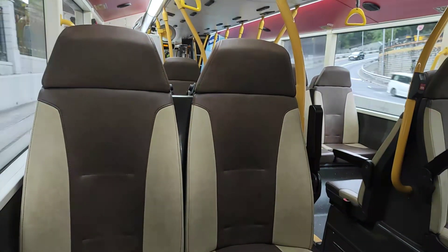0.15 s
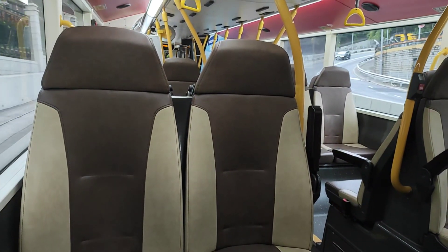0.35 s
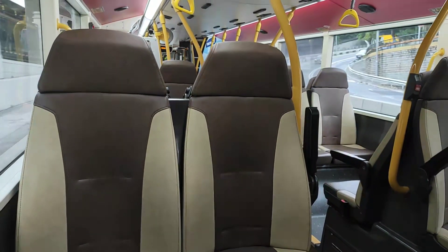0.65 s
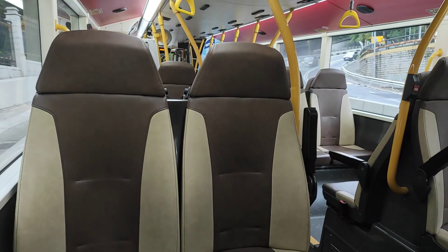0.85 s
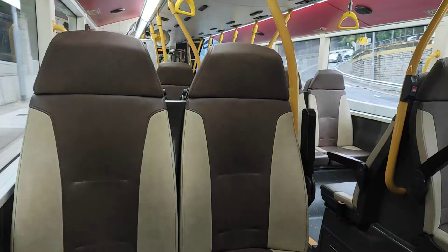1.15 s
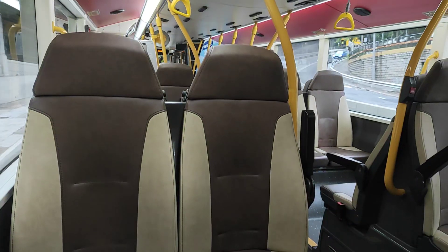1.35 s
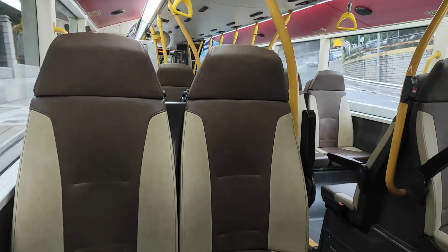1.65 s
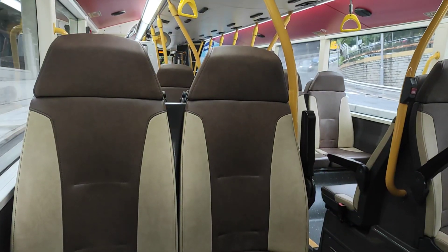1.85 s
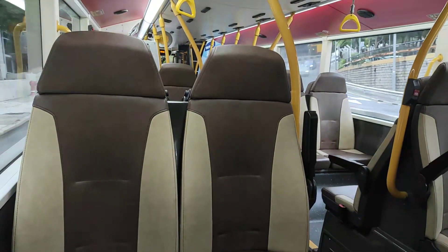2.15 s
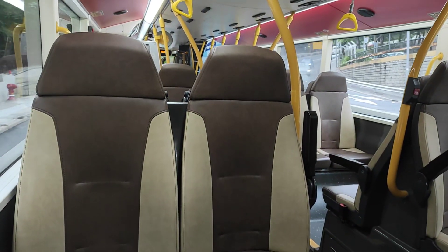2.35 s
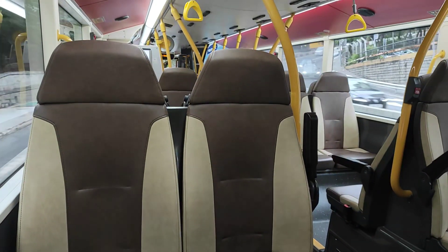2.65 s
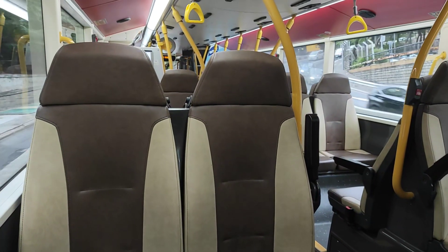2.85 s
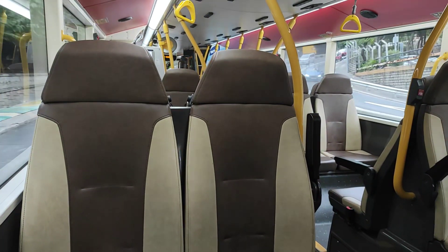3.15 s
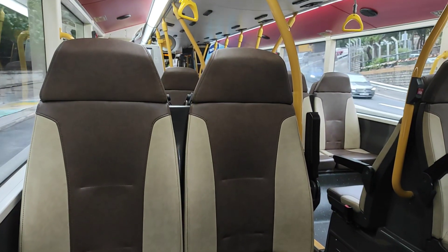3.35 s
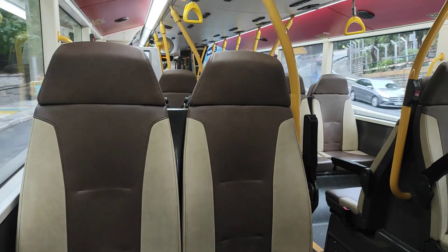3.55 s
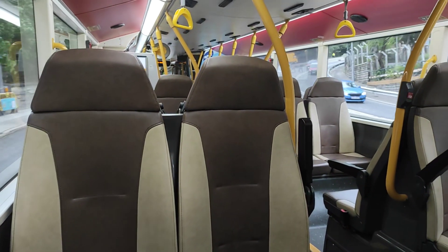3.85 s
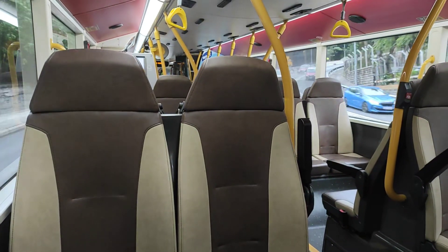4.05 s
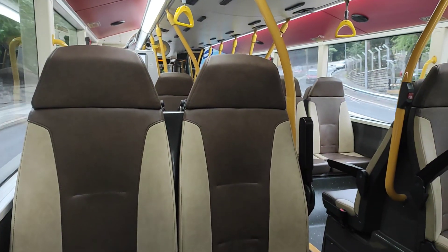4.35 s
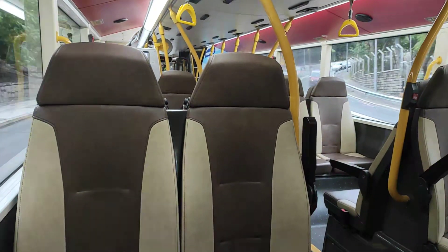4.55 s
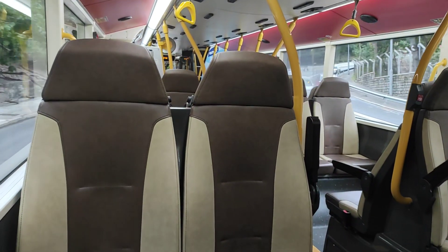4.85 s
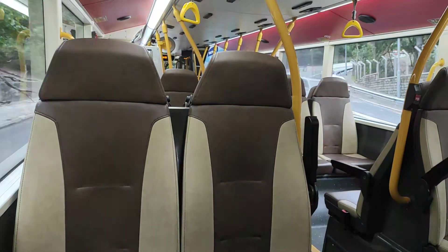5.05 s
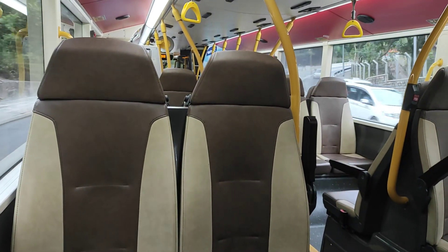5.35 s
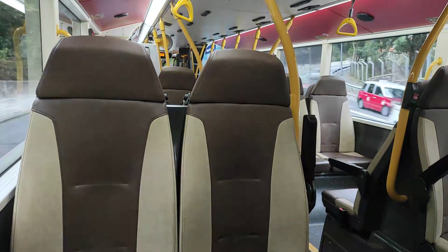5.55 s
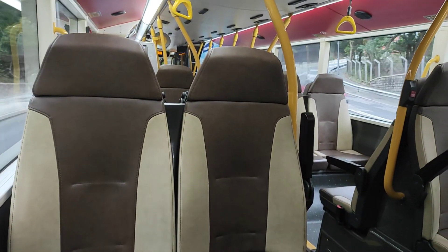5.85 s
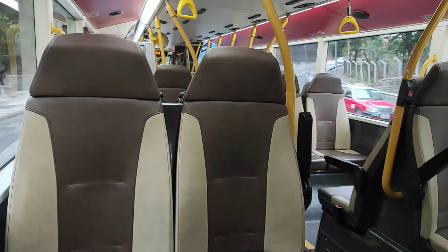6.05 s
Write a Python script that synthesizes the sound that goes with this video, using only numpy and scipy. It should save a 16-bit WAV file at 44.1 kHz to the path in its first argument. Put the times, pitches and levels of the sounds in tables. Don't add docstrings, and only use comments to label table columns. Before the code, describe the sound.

Inside a bus upper deck, a diesel engine drones and slowly climbs in pitch, then drops at a gear change over road roar and rattling trim.

```python
import sys
import numpy as np
from scipy import signal
from scipy.fft import rfft, irfft, dct, next_fast_len
from scipy.io import wavfile
from scipy.ndimage import uniform_filter1d, map_coordinates

SR = 44100
rng = np.random.default_rng(int(sys.argv[2]) if len(sys.argv) > 2 else 0)


def master_out(mix):
    frames = np.transpose(np.atleast_2d(mix))
    ceiling = np.clip(frames, -1, 1)
    pcm = np.round(ceiling * 32767).astype(np.int16)
    wavfile.write(sys.argv[1], SR, pcm)


def invert_db(x):
    u = np.asarray(x, float) / 20
    return 10 ** u


N = 273861


def unit(x):
    return x / np.sqrt(np.mean(x ** 2) + 1e-20)


def along(points, hz):
    f, v = np.transpose(points)
    return np.interp(np.log(hz + 1), np.log(f + 1), v)


def curves(rows):
    s, *columns = np.transpose(rows)
    return [np.interp(np.arange(N) / SR, s, column) for column in columns]


def wobble(rate):
    at = np.arange(0, N + 32, 32)
    knots = rng.standard_normal(int(N * 400 / SR) + 4)
    return np.interp(np.arange(N), at, map_coordinates(knots, [at * rate / SR]))


def humps(times, db, half_s):
    t = np.arange(0, N + 64, 64) / SR
    power = sum(invert_db(2 * d) * np.exp(-((t - s) / half_s) ** 2) for s, d in zip(times, db))
    return np.interp(np.arange(N) / SR, t, power)


def filtered(x, response):
    m = next_fast_len(N + SR // 2)
    return irfft(rfft(x, m) * response(np.fft.rfftfreq(m, 1 / SR)), m)[..., :N]


# frequency_hz, likeness (0-1)
PORT_LIKENESS = [(30, .996), (80, .996), (130, .97), (200, .84), (340, .68), (480, .4), (600, .15),
                 (1070, .03), (16000, 0)]


def port_angle(hz):
    return np.arccos(np.clip(along(PORT_LIKENESS, hz), -1, 1)) / 2


def rush(spectrum, patchy_db, source=None):
    noise = rng.standard_normal((2, N)) * (1 if source is None else source)
    z = signal.stft(noise, nperseg=512)[2]
    patches = uniform_filter1d(rng.standard_normal(z.shape[1:]), size=5, axis=0)
    patches = uniform_filter1d(patches, size=10, axis=1)
    pair = signal.istft(z * invert_db(patchy_db * unit(patches)), nperseg=512)[1][:, :N]

    def response(hz):
        angle = port_angle(hz)
        return invert_db(along(spectrum, hz)) * [np.cos(angle), np.sin(angle)]

    mid, side = filtered(pair, response)
    return np.array([mid + side, mid - side]) / np.std(mid)


def tone(hz, fuzz_hz, start=0):
    cycles = np.cumsum(hz + fuzz_hz * wobble(60)) / SR + start
    apart = port_angle(hz.mean()) * np.array([[1], [-1]])
    return np.sqrt(2) * np.sin(2 * np.pi * cycles + apart * rng.choice([-1, 1]))


# time_s, level_db
ROUGHNESS = [(0, -36.5), (.22, -37.5), (.4, -39), (1.0, -38), (1.12, -35.5), (1.8, -36), (2.4, -37.5),
             (2.75, -36.5), (3.3, -37.5), (4.0, -37), (4.2, -35.5), (5.3, -36.5), (5.64, -38.5),
             (6.21, -38.5)]


def road_db():
    db, = curves(ROUGHNESS)
    return db - db.mean()


# frequency_hz, level_db
LOW_COLOUR = [(30, -59), (50, 4), (75, 2), (100, 4.5), (150, 5), (185, 1.5), (205, -4), (350, -3),
              (590, -8), (670, -12), (1130, -11), (1300, -14.5), (1500, -36.5), (2500, -120)]
# frequency_hz, level_db
UPPER_COLOUR = [(700, -120), (1200, -3.5), (1500, -3), (2100, -2), (2650, -1), (3300, -4), (3500, -8),
                (4200, -10.5), (5500, -9.5), (7000, -11.5), (12000, -120)]


def roar():
    road = road_db()
    low = invert_db(-23 + 0.5 * road) * rush(LOW_COLOUR, patchy_db=0.7)
    upper = invert_db(-35.5 + 0.9 * road + 0.18 * wobble(8.3)) * rush(UPPER_COLOUR, patchy_db=0.5)
    return low + upper


# frequency_hz, level_db
BOUNCE_COLOUR = [(5, -40), (9, -10), (11.5, 0), (14.5, -4), (19, -25), (40, -120)]
# frequency_hz, level_db
THUD_COLOUR = [(10, -57), (18, -2), (25, -5), (33, -3.5), (45, -11), (60, -27), (90, -120)]
# time_s, bounce_db, thud_db
ROAD_SWELLS = [(.15, -18.5, -36), (.6, -39, -23), (1.199, -13, -24.5), (1.45, -21, -24), (1.8, -23, -18.5),
               (2.2, -18.5, -24.5), (2.65, -20.5, -14), (2.92, -15.5, -31.5), (3.3, -19.5, -18),
               (3.85, -23.5, -16.5), (4.2, -18.5, -18), (4.55, -18.5, -22), (4.95, -25.5, -14),
               (5.35, -17, -21.5), (5.62, -15, -29.5), (6.05, -26.5, -19.5)]


def body():
    swell_s, even_s, evenness = 0.12, 0.18, 0.8
    s, bounce_db, thud_db = np.transpose(ROAD_SWELLS)
    road = road_db()
    out = 0
    for colour, rest_db, db in (BOUNCE_COLOUR, -28, bounce_db), (THUD_COLOUR, -23.5, thud_db):
        swing = rush(colour, patchy_db=0.5)
        power = np.abs(uniform_filter1d(swing.mean(0) ** 2, size=int(even_s * SR))) + 0.018
        size = np.sqrt(invert_db(2 * (rest_db + 0.9 * road)) + humps(s, db, swell_s))
        out = out + size * unit(swing / power ** (evenness / 2))
    return out


# frequency_hz, level_db
TRIM_COLOUR = [(1500, -74), (3000, -15), (4500, -14.5), (6300, -12.5), (7000, -4.5), (7580, -0.5),
               (8300, -3), (9300, -8), (10000, -12.5), (10400, -21.5), (11400, -24.5), (12300, -25),
               (14500, -24.5), (16500, -64)]
# time_s, rattle_db (above the sizzle)
ROAD_JOINTS = [(0.0, 3), (0.119, 3.5), (1.08, 1.5), (1.158, 0), (1.39, -3.5), (1.759, 1.5), (2.0, -4.5),
               (2.59, -5.5), (2.728, 0.5), (2.92, 2), (3.44, -2.5), (3.17, -1), (3.75, -2), (4.09, 1),
               (4.249, 2.5), (4.36, 1), (4.55, -7), (4.769, 2), (4.982, 5.5), (5.422, -1), (5.51, 3.5),
               (5.86, -6)]


def sizzle():
    rattle_s = 0.022
    size = invert_db(-37 + road_db()) * np.sqrt(1 + humps(*np.transpose(ROAD_JOINTS), rattle_s))
    contacts = invert_db(1.5 * wobble(350) + 0.58 * wobble(30))
    return size * rush(TRIM_COLOUR, patchy_db=1.0, source=contacts)


# start_s, peak_db, left_right_db
KNOCKS = [(0.6913, -30, 6), (2.7112, -36, -3), (3.4191, -24, -8), (4.0502, -20, -1), (4.0816, -20, -3),
          (4.2233, -20, -7), (4.351, -9, -7), (4.8534, -21, -6), (4.9701, -12, 4), (5.5363, -24, 2),
          (6.0496, -22, -14), (6.1664, -19, 12)]


def knocks():
    out = np.zeros((2, N + SR))
    t = np.arange(SR // 20) / SR
    for s, db, pan_db in KNOCKS:
        burst = invert_db(db - 12.5 - 60 * t / 0.03) * rng.standard_normal((2, len(t)))
        first = round(s * SR)
        out[:, first:first + len(t)] += burst * invert_db([[pan_db / 2], [-pan_db / 2]])
    return filtered(out[:, :N], lambda hz: invert_db(along(TRIM_COLOUR, hz)))


# time_s, pitch_hz, level_db (rms)
BLADE_WHISTLE = [(0, 8914, -45), (.3, 9090, -47), (.5, 9340, -44), (.75, 9535, -40), (1.1, 9790, -45),
                 (1.4, 9850, -46.5), (1.8, 9990, -50), (2.25, 10400, -47), (2.6, 10700, -50),
                 (3.0, 10940, -49.5), (3.6, 11050, -48), (4.6, 11090, -50), (4.85, 10980, -50),
                 (5.0, 10630, -49), (5.4, 10150, -50), (5.54, 9820, -35), (5.76, 9710, -41.5),
                 (6.21, 9720, -44.5)]


def turbo():
    hz, db = curves(BLADE_WHISTLE)
    flicker = invert_db(3.5 * np.array([wobble(40), wobble(40)]))
    core = np.array([tone(hz, fuzz_hz=48)[0], tone(hz, fuzz_hz=48)[0]])
    skirt = np.array([tone(hz, fuzz_hz=130)[0], tone(hz, fuzz_hz=130)[0]])
    return invert_db(db + 2.5) * (unit(flicker) * core + invert_db(-6.5) * skirt)


# time_s, cycle_hz (four-stroke cycles)
ENGINE_SPEED = [(0, 12.09), (.4, 12.1), (.8, 12.21), (1.3, 12.24), (1.6, 12.38), (2.4, 12.57), (2.8, 12.86),
                (4.0, 13.38), (4.4, 13.43), (4.8, 13.57), (5.2, 12.1), (5.3, 11.51), (5.5, 10.04),
                (5.6, 9.79), (5.9, 9.71), (6.21, 9.69)]


def engine_cycle_hz():
    return curves(ENGINE_SPEED)[0]


# multiple (of the cycle), early_db (rms), later_db (rms)
DRIVEN_WHINES = [(81, -52, -53), (93, -53, -54), (250.7, -50, -52), (288, -57, -62), (401, -53, -58),
                 (451, -51, -59)]


def whines():
    cycle_hz = engine_cycle_hz()
    out = np.zeros((2, N))
    for k, early_db, later_db in DRIVEN_WHINES:
        db, = curves([(1.2, early_db), (1.7, later_db), (5.0, later_db), (5.3, later_db - 7)])
        out += invert_db(db + 2 * wobble(4)) * tone(k * cycle_hz, fuzz_hz=6)
    return out


# frequency_hz, width_hz, level_db
CABIN_RESONANCES = [(56.3, 1.5, 2.5), (72.67, 4.4, -5), (125, 18.3, -4.5), (143.2, 5.3, -7),
                    (157.5, 3, -2.5), (185.4, 6.5, -1.5), (255, 8.2, -9), (305, 16, 1.5), (348, 8.9, 9.5),
                    (367.5, 7.9, 1.5), (443, 17, -2.5), (483, 17, 3), (586, 20, 2)]


def cabin_gain(hz):
    power = sum(invert_db(db) ** 2 / (1 + (2 * (hz - c) / w) ** 2) for c, w, db in CABIN_RESONANCES)
    return np.sqrt(power + invert_db(-27.0) ** 2)


# multiple (of the cycle), level_db (rms)
ENGINE_ORDERS = [(5, -32), (6, -14.5), (7, -36), (9, -20), (10, -23.5), (11, -31), (12, -18), (13, -35),
                 (14, -22.5), (15, -28.5), (16, -33.5), (17, -27.5), (18, -31), (19, -33.5), (20, -34.5),
                 (21, -37), (22, -38), (23, -42.5), (24, -38), (26, -44), (27, -48), (30, -37.5),
                 (33, -40.5), (36, -41.5), (39, -46.5), (40, -40), (45, -38), (48, -41.5), (50, -39),
                 (51, -47.5)]
# time_s, level_db
FIRING_SWELLS = [(0, 1), (.7, 1.5), (1.2, -2), (1.7, -2.5), (2.3, 3.5), (2.65, 3.5), (2.95, -3), (3.45, -4),
                 (3.8, 0), (4.2, 3), (4.8, -2), (5.25, 2.5), (5.5, -2.5), (6.21, -1)]


def engine():
    cycle_hz = engine_cycle_hz()
    firing_db, = curves(FIRING_SWELLS)
    null_db = 7.5 * np.exp(-((cycle_hz - 12.38) / 0.23) ** 2)
    second_db = 2 + 0.17 * firing_db - null_db
    swell_db = {6: firing_db, 12: second_db}
    shift_s, shift_half_s = 5.4, 0.15
    cut_db = 1.5 * np.exp(-((np.arange(N) / SR - shift_s) / shift_half_s) ** 2)
    grid_hz = np.arange(20., 800.)
    cabin = cabin_gain(grid_hz)
    out = np.zeros((2, N))
    for k, db in ENGINE_ORDERS:
        k = round(k)
        gain = invert_db(db - cut_db + swell_db.get(k, 0) + 0.7 * wobble(3))
        gain = gain * np.interp(k * cycle_hz, grid_hz, cabin)
        late = 0.04 * k ** 2
        out += gain * tone(k * cycle_hz, fuzz_hz=0.1, start=-late)
    return out


def scene():
    return roar() + body() + sizzle() + knocks() + turbo() + whines() + engine()


# frequency_hz, step_db (above the usual level)
BAND_STEPS = [(300, -20), (800, -6), (1400, 5), (2600, 5), (3600, 7.5), (5000, 7.5), (6300, 6), (7500, 3),
              (9000, 6), (9900, 10), (10500, 16), (11300, 19), (12300, 20), (14200, 14), (15300, 22)]


def coarse_bands(x, scatter_db):
    hop = 940
    frames = N // hop + 2
    window = np.sin(np.pi * (np.arange(2 * hop) + 0.5) / (2 * hop))
    halves = np.pad(x, ((0, 0), (hop, frames * hop - N))).reshape(2, frames + 1, hop)
    blocks = np.concatenate([halves[:, :-1], halves[:, 1:]], axis=2) * window
    a, b, c, d = np.split(blocks, 4, axis=2)
    folded = np.concatenate([-c[..., ::-1] - d, a - b[..., ::-1]], axis=2)
    lines = dct(folded, type=4, norm="ortho")
    usual = signal.medfilt(np.median(np.abs(lines), axis=(0, 1)), kernel_size=15) * 1.5
    scatter = np.repeat(rng.standard_normal((frames, hop // 6 + 1)), 6, axis=1)[:, :hop]
    scatter = unit(uniform_filter1d(scatter, size=3, axis=0))
    hz = np.arange(hop) * SR / (2 * hop)
    masked = uniform_filter1d(np.abs(lines), size=9, axis=2) * (hz > 9000)
    step = usual * invert_db(along(BAND_STEPS, hz) + scatter_db * scatter)
    step = np.maximum(step, masked) + 1e-9
    kept = np.sign(lines) * np.floor(np.abs(lines) / step + 0.4) * step
    u, v = np.split(dct(kept, type=4, norm="ortho"), 2, axis=2)
    y = np.concatenate([v, -v[..., ::-1], -u[..., ::-1], -u], axis=2) * window
    return (y[:, 1:, :hop] + y[:, :-1, hop:]).reshape(2, -1)[:, :N]


def band_limit(x):
    return signal.sosfilt(signal.butter(12, 15760, fs=SR, output="sos"), x)


# frequency_hz, left_right_db
PORT_BALANCE = [(100, .2), (210, .5), (270, 3.5), (440, 2.5), (580, .5), (700, 3), (1100, 2), (2200, .3),
                (4800, -1), (6300, -3.5), (7400, -10), (8200, .5), (9000, 5), (12000, 0)]


def record(dry):
    ports = filtered(dry, lambda hz: invert_db(np.outer([0.5, -0.5], along(PORT_BALANCE, hz))))
    ports = ports / (1 + np.abs(ports / 0.69) ** 5) ** (1 / 5)
    mix = coarse_bands(ports, scatter_db=5.5)
    return band_limit(mix)


dry = scene()
out = record(dry)
master_out(out)
```